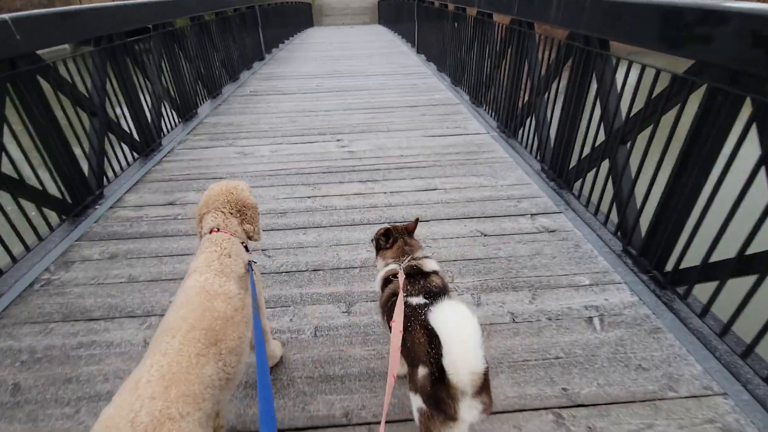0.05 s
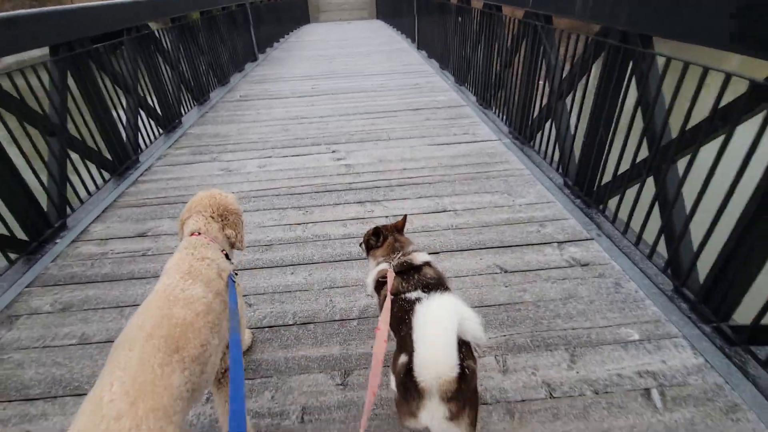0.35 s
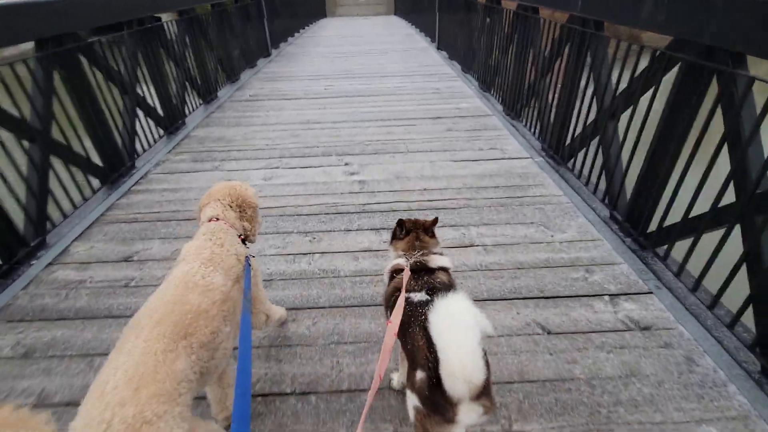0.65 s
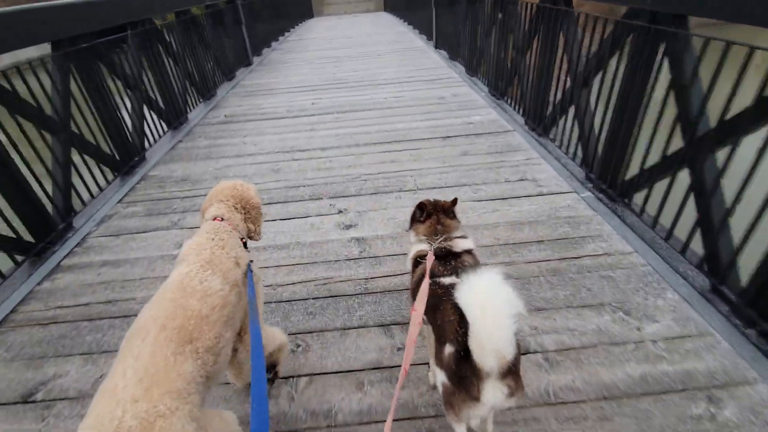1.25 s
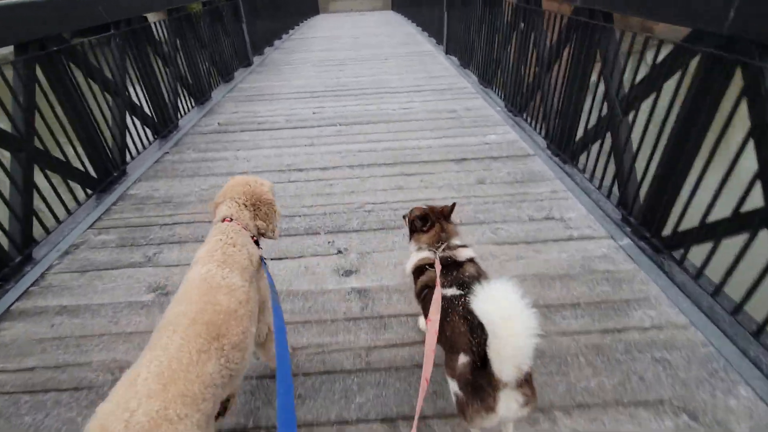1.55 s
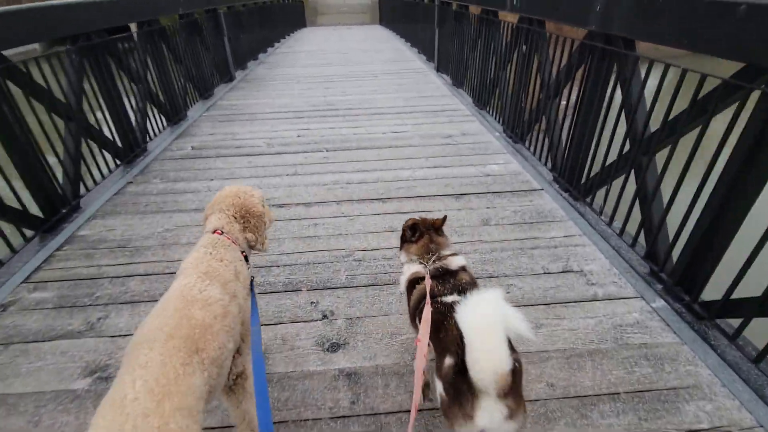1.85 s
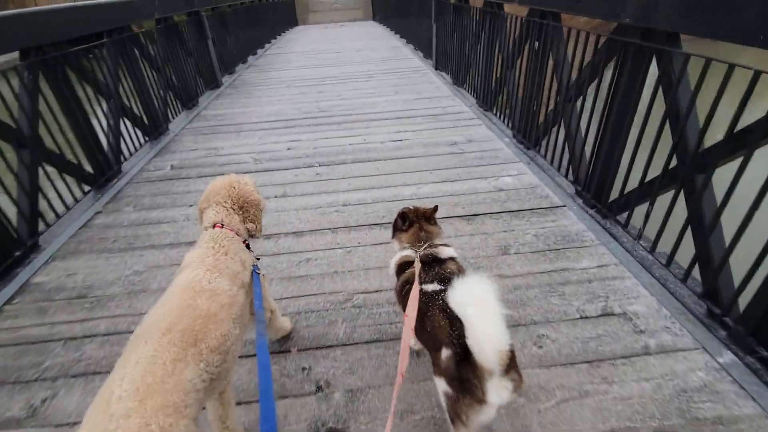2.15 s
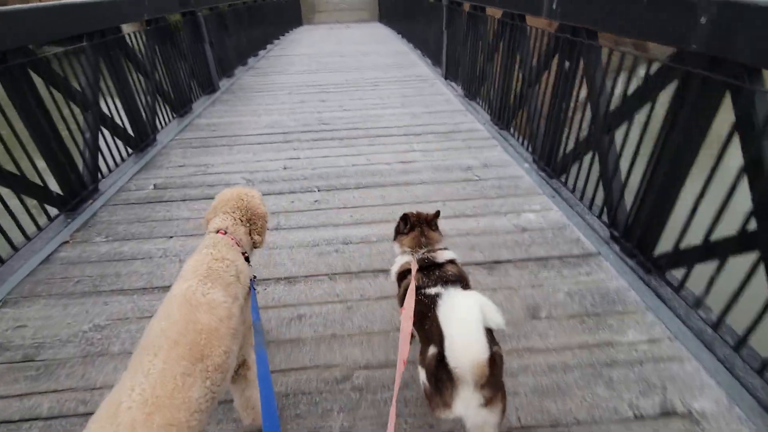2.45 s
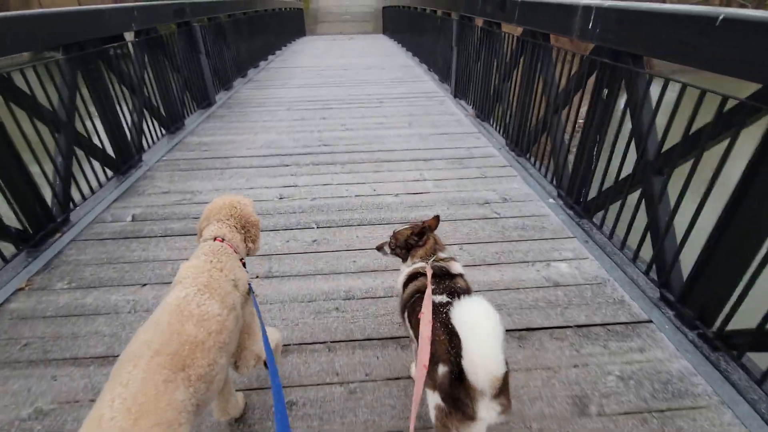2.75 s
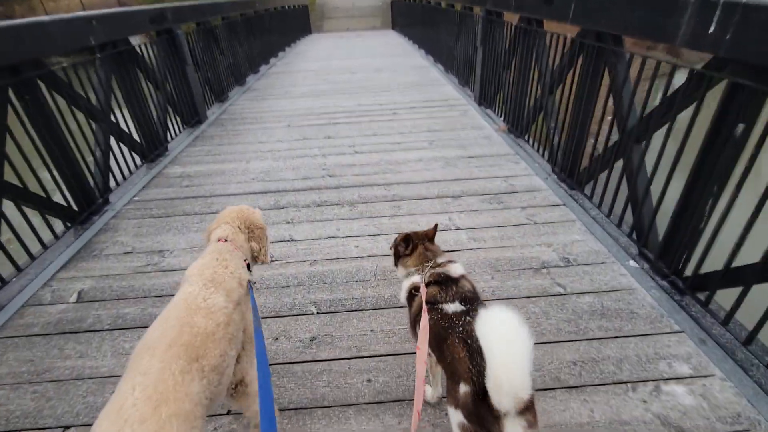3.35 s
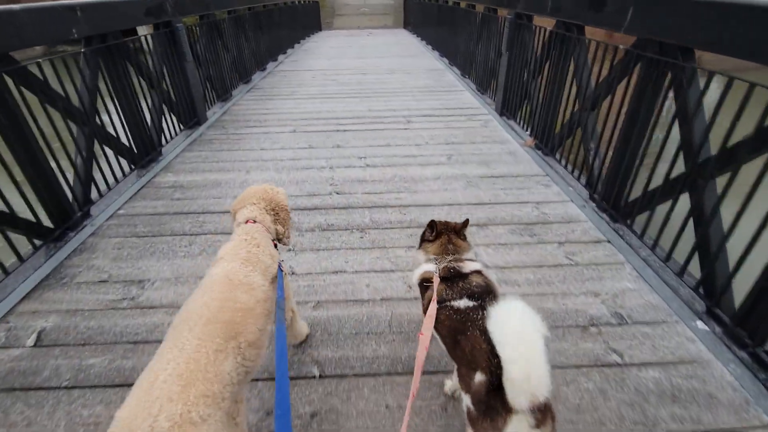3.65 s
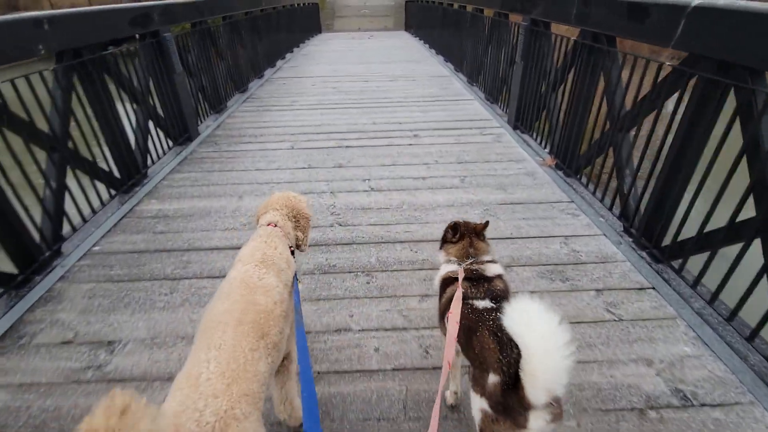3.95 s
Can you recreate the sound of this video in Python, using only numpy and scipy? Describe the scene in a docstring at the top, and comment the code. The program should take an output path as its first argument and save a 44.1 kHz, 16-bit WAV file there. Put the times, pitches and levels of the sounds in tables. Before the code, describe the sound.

Shoes crunch softly on damp grit and knock on bridge planks at an even walking pace. Two dogs patter faintly alongside with scattered claw and leash clicks, while light rain hisses throughout and air rumbles on the nearby microphone.

```python
"""On a plank footbridge in light drizzle, someone walks two dogs at two steps a second.
Each sole rolls over damp grit, which crackles, and the boards knock and ring briefly.
Paws patter; claws, leash fittings and nearby drops tick. Under it all lie the hiss of the drizzle,
a few thuds of the deck and a low rumble of the deck and of air on the microphone."""
import sys
import numpy as np
from scipy import signal
from scipy.fft import rfft, irfft
from scipy.io import wavfile
from scipy.ndimage import uniform_filter1d

SR = 44100
rng = np.random.default_rng(int(sys.argv[2]) if len(sys.argv) > 2 else 0)


def int16_out(signal):
    """Quantize to a 16-bit WAV file."""
    q = np.round(np.clip(np.atleast_2d(signal).T, -1, 1) * 32767)
    wavfile.write(sys.argv[1], SR, q.astype(np.int16))


N = 176400
T = np.arange(N) / SR
LEFT_LAG_SAMPLES = round(.00011 * SR)
TICK_DECAY_S, TICK_TAIL_DB, RAIN_PAN_DB = .0009, 1.5, -2

# The tone shared by ticks and splashes: pitch_hz, level_db
TICK_TONE = [(500, 10), (2600, 3.5), (7500, 3.5), (10000, 1.5), (12800, 10.5), (16000, -8)]


def soles(grains_per_s=3000, treble_above_hz=1160, brighten_db=2.5):
    """The heel scrapes, then grit crackles under the rolling sole, with a surge as weight comes down."""
    # Footsteps: start_s, length_s, roll_db, heel_db, press_s, press_db, press_half_width_s, heel_treble_db
    steps = [(.13, .185, -36.5, -35, .195, -32.5, .014, -3), (.588, .2, -39, -40, .725, -35, .035, -2),
             (1.102, .15, -42, -30.5, 1.217, -29, .012, -5),
             (1.627, .148, -39.5, -41, 1.698, -28.5, .021, 0),
             (2.075, .21, -37.5, -33.5, 2.195, -37, .03, -2),
             (2.586, .166, -36.5, -35, 2.67, -33.5, .028, 2),
             (3.041, .185, -36.5, -29.5, 3.11, -37, .035, -6),
             (3.562, .165, -41, -35.5, 3.657, -32.5, .019, 4)]
    # The tone of a gritty sole on wood: pitch_hz, level_db
    sole_tone = [(120, -4), (350, -8), (540, -2), (800, -5), (1450, 0.5), (1900, 1), (2400, -6), (3100, -3),
                 (4500, -13), (15000, -48)]
    # The tone of the fine wet scuff that follows the roll: pitch_hz, level_db
    scuff_tone = [(800, -8), (2600, 6), (6500, 2), (10000, -9), (13000, -4), (15500, -18)]
    attack_s, release_s, heel_decay_s, heel_tone_s = .005, .022, .035, .06
    power, slide, treble_db = np.zeros((3, N))
    for start, length, roll_db, heel_db, press_s, press_db, width, heel_treble_db in steps:
        age = np.maximum(T - start, 0)
        roll = np.clip(age / attack_s, 0, 1) * np.clip((length - age) / release_s + .5, 0, 1)
        heel = undb(heel_db) * np.exp(-age / heel_decay_s)
        press_power = undb(press_db) ** 2 * bump(press_s, width)
        power += roll ** 2 * (undb(roll_db) ** 2 + heel ** 2 + press_power)
        slide += bump(start + .63 * length, half_width_s=.07)
        toe_db = brighten_db * (age / length - .5)  # brighter towards the toe
        treble_db += (roll > 0) * (toe_db + heel_treble_db * np.exp(-age / heel_tone_s))
    grit = spread(grains(grains_per_s, spread_db=3.9), diffuse=.45)
    grit = flicker(colour(grit, sole_tone), depth_db=2, per_s=40)
    dull = signal.sosfiltfilt(signal.butter(2, treble_above_hz, fs=SR, output="sos"), grit)
    grit = dull * undb(-treble_db / 2) + (grit - dull) * undb(treble_db / 2)
    fine_grit = spread(grains(grains_per_s, spread_db=3.9), diffuse=1)
    scuff = undb(-44.5) * slide * colour(fine_grit, scuff_tone)
    clumps = unit(undb(1.75 * wander(per_s=190)))
    return (undb(-1.8) * np.sqrt(power) * clumps * grit + scuff) * pan(-3.5)


def knocks(usual_hz=1580, usual_db=-25.5, octaves_per_db=.1):
    """Heels, toes and paws knock on the planks; harder knocks sound deeper."""
    # Blows on the wood: start_s, level_db
    blows = [(.133, -25), (.1895, -20.5), (.2365, -28), (.5875, -26), (.6455, -28), (.7675, -25),
             (.777, -25), (1.2175, -18.5), (1.297, -31), (1.3225, -32), (1.5395, -24), (1.68, -25),
             (2.0795, -26), (2.2465, -20.5), (2.5925, -25), (2.7205, -25), (3.0435, -22), (3.1995, -26),
             (3.2135, -26), (3.238, -30), (3.5635, -25), (3.6695, -28), (3.7125, -26), (3.791, -32),
             (3.8195, -27), (3.869, -32), (3.9345, -28)]
    out = np.zeros((2, N))
    for start, db in blows:
        hz = usual_hz * 2 ** (octaves_per_db * (usual_db - db))
        knock = hit(hz, width_oct=1.3, tone_db=0, decay_s=.0046, tail_db=-1, order=2)
        add(out, start, undb(db) * pan(-6) * knock)
    out[0] = np.roll(out[0], LEFT_LAG_SAMPLES)
    return out


def planks(blows, ring_db=-17.5):
    """The boards ring briefly after whatever strikes them; returns the blows plus the ring."""
    # The notes of a board: pitch_hz, level_db, ring_s (time to fade by 60 dB)
    notes = [(507, 0.5, 0.037), (1344, -23, 0.032), (1480, 4, 0.063), (1784, 10, 0.017)]
    t = T[:8192]
    board = sum(undb(db - 60 * t / ring_s) * np.sin(2 * np.pi * hz * t) for hz, db, ring_s in notes)
    ring = signal.fftconvolve(blows, board[None], axes=1)[:, :N]
    return blows + undb(ring_db) * np.std(blows) * unit(ring)


def ticks(claw_hz=3960, claw_width_oct=1.3, gain_db=-1):
    """Claws, leash fittings and close drops make hard little hits that die within a few milliseconds."""
    # Claws on the boards: start_s, level_db
    claws = [(.035, -29), (.2892, -24), (.2918, -26), (.3147, -28), (.481, -30), (1.7324, -25),
             (1.9465, -28), (2.3728, -27), (2.4395, -26), (2.487, -28), (2.5685, -23), (2.6681, -25),
             (2.9588, -26), (2.982, -29), (2.9945, -26), (3.3807, -28), (3.429, -29), (3.676, -27),
             (3.7585, -25), (3.9863, -26)]
    # Snaps of leash fittings and close drops: start_s, level_db, pitch_hz, width_octaves, pan_db
    snaps = [(.2586, -19.5, 4500, .8, -3), (.4884, -27, 9500, .7, 7), (.929, -23, 8200, .42, 0),
             (1.2276, -14, 2900, 1.4, 11), (1.2824, -13.5, 5300, .58, -1), (1.5493, -19, 7500, 1.6, 14),
             (3.0249, -25, 13500, .7, 12), (3.2645, -24, 15500, .17, 5), (3.2898, -20.5, 8200, .8, 0),
             (3.5299, -26, 9000, 1.3, 5), (3.8378, -19, 9000, .8, 0)]
    out, tone = np.zeros((2, N)), curve(TICK_TONE)
    for start, db in claws:
        add(out, start, undb(db + gain_db) * pan(-3) * hit(claw_hz, claw_width_oct, tone))
    for start, db, hz, width, pan_db in snaps:
        add(out, start, undb(db + gain_db) * pan(pan_db) * hit(hz, width, tone))
    return out


def thuds(pitch_hz=62, rise_s=.011):
    """The deck gives under a load and swings for a few cycles."""
    # Loads on the deck: start_s, peak_db
    loads = [(.488, -29.5), (2.371, -31), (3.633, -23.5)]
    out, t = np.zeros((2, N)), T[:8192]
    swing = t / rise_s * np.exp(1 - t / rise_s) * np.sin(2 * np.pi * pitch_hz * t)
    for start, db in loads:
        add(out, start, undb(db) * swing[None])
    return out


def paws():
    """The dogs' paws patter faintly, as a stream of random taps."""
    # The tone of a light paw on wood: pitch_hz, level_db
    paw_tone = [(200, -4), (600, 4), (1600, 2.5), (3000, 2.5), (6000, 1.5), (15000, -21)]
    taps = spread(grains(per_s=90, spread_db=3.5), diffuse=.41)
    return undb(-53.5) * pan(-6) * colour(taps, paw_tone)


def splashes(per_s=28, middle_hz=6900):
    """Single drops land close by, each with its own loudness, pitch and side."""
    out, tone = np.zeros((2, N)), curve(TICK_TONE)
    for when, softness, pitch, side in rng.random((int(per_s * N / SR), 4)):
        db = -39 - 2 * np.log(softness + .041)  # many quiet, few loud
        hz = middle_hz * 2 ** (2 * pitch - 1)  # up to an octave either way
        drop = hit(hz, width_oct=.59, tone_db=tone)
        add(out, when * N / SR, undb(db) * pan(RAIN_PAN_DB + 10 * (side - .5)) * drop)
    return out


def drizzle(waver_db=.62):
    """Far drops merge into a gently wavering hiss; nearer ones prickle."""
    # The tone of fine rain: pitch_hz, level_db
    rain_tone = [(150, 8), (300, 3), (500, 2), (900, -0.5), (1600, 3), (2500, 0.5), (4200, 2), (6500, 2.5),
                 (8000, -2), (10000, -5), (11300, -2.5), (12700, 3.5), (14200, -4), (15700, -6),
                 (16300, -38)]
    far = undb(-41.5) * colour(spread(noise(), diffuse=1), rain_tone)
    drops = spread(grains(per_s=900, spread_db=5), diffuse=.52)
    near = undb(-47) * colour(drops, rain_tone)
    return (far + near) * pan(RAIN_PAN_DB) * undb(waver_db * wander(per_s=12))


def rumble(floor_db=-45.5, smooth_s=.066):
    """The deck and the air on the microphone rumble in short swells."""
    # Swells of the rumble: peak_s, half_width_s, level_db
    swells = [(.5, 0.015, -39.5), (.58, 0.019, -37), (.76, 0.024, -42), (.91, 0.074, -43),
              (1.1, 0.032, -33), (1.235, 0.035, -34), (2.085, 0.0089, -38), (2.36, 0.036, -38),
              (2.47, 0.012, -38), (2.69, 0.054, -42.5), (2.84, 0.028, -42.5), (3.055, 0.0072, -33),
              (3.21, 0.051, -31.5), (3.37, 0.013, -33.5), (3.52, 0.11, -39.5), (3.648, 0.014, -33.5),
              (3.79, 0.052, -39.5), (3.94, 0.023, -36)]
    # The tone of the rumble: pitch_hz, level_db
    rumble_tone = [(20, -16), (35, -9), (50, -6), (66, 2.5), (95, -1.5), (135, -6.5), (200, -11.5),
                   (300, -20.5), (500, -38), (1200, -59.5)]
    power = undb(floor_db) ** 2 + sum(undb(db) ** 2 * bump(s, width) for s, width, db in swells)
    low = colour(spread(noise(), diffuse=.085), rumble_tone)
    steady = low / np.sqrt(uniform_filter1d(np.mean(low ** 2, axis=0), int(smooth_s * SR)))
    return np.sqrt(power) * steady


def hit(hz, width_oct, tone_db, decay_s=TICK_DECAY_S, tail_db=TICK_TAIL_DB, order=1, size=2048):
    """One click with a short rough tail, stressed around hz; as much energy as 1 ms at level 1."""
    octaves = np.log2((np.fft.rfftfreq(size, 1 / SR) + 1) / hz)
    body = response(tone_db - 20 * order * np.log10(1 + (octaves / width_oct) ** 2))
    tail = rng.standard_normal((2, size)) * np.exp(-T[:size] / decay_s)
    tail[:, 0] = 0
    push = undb(tail_db) * tail / np.sqrt(np.sum(tail ** 2, axis=1, keepdims=True))
    push[:, 0] += 1
    sound = signal.fftconvolve(push, body[None], axes=1)
    return sound * np.sqrt(SR / 1000 / np.sum(sound ** 2, axis=1, keepdims=True))


def grains(per_s, spread_db):
    """Three streams of random clicks, many small and few large."""
    size = undb(spread_db * np.minimum(rng.exponential(size=(3, N)), 4.5))
    return unit((rng.random((3, N)) < per_s / SR) * size * rng.choice([-1, 1], (3, N)))


def noise():
    """Three unrelated white noises."""
    return rng.standard_normal((3, N))


def wander(per_s):
    """A smooth random drift, typically about 1 either side of zero."""
    hold = int(SR / per_s)
    return 1.73 * uniform_filter1d(np.repeat(rng.standard_normal(N // hold + 1), hold), hold)[:N]


def flicker(x, depth_db, per_s, count=24):
    """Bands of pitch rise and fall on their own, so the tone keeps changing."""
    centres = np.log(np.geomspace(300, 5000, count))
    log_hz, spectrum = np.log(np.fft.rfftfreq(N, 1 / SR) + 1), rfft(x)
    bands = (irfft(spectrum * np.interp(log_hz, centres, pick), N) for pick in np.eye(count))
    return unit(sum(band * undb(depth_db * wander(per_s)) for band in bands))


def bump(peak_s, half_width_s):
    """A bell-shaped rise and fall in time."""
    return np.exp(-.5 * ((T - peak_s) / half_width_s) ** 2)


def curve(points, size=2048):
    """Join the points of a tone table into a level in dB for every pitch."""
    hz, db = np.array(points, float).T
    return np.interp(np.log(np.fft.rfftfreq(size, 1 / SR) + 1), np.log(hz), db)


def response(db):
    """How one click sounds through a filter with this tone curve."""
    cepstrum = irfft(np.log(undb(db)))
    half = len(cepstrum) // 2
    cepstrum[1:half] *= 2
    cepstrum[half + 1:] = 0  # nothing sounds before the click
    return irfft(np.exp(rfft(cepstrum)))


def colour(x, points):
    """Give both channels the tone in a table, at level 1."""
    return unit(signal.fftconvolve(x, response(curve(points, 8192))[None], axes=1)[:, :N])


def spread(three, diffuse):
    """Stereo from one shared signal, slightly late on the left, and one of its own for each side."""
    shared = np.array([np.roll(three[0], LEFT_LAG_SAMPLES), three[0]])
    return np.sqrt(1 - diffuse) * shared + np.sqrt(diffuse) * three[1:]


def pan(db):
    """Left and right gains; positive db leans left."""
    return unit(undb(np.array([[db], [-db]]) / 2))


def undb(db):
    """Decibels to gain."""
    return 10 ** (np.asarray(db) / 20)


def unit(x):
    """Scale to an average (rms) level of 1."""
    return x / np.sqrt(np.mean(x ** 2) + 1e-18)


def add(out, start_s, sound):
    """Mix a sound in at a time."""
    i = int(np.clip(start_s * SR, 0, N - 1))
    out[:, i:i + sound.shape[1]] += sound[:, :N - i]


def scene():
    """Walker and dogs on the bridge, with the weather around them."""
    return planks(soles() + knocks() + paws()) + thuds() + ticks() + drizzle() + rumble() + splashes()


def record(dry, top_hz=16700):
    """Cut off the very highest treble."""
    return signal.sosfilt(signal.ellip(8, .2, 70, top_hz, fs=SR, output="sos"), dry)


dry = scene()
out = record(dry)
int16_out(out)
```